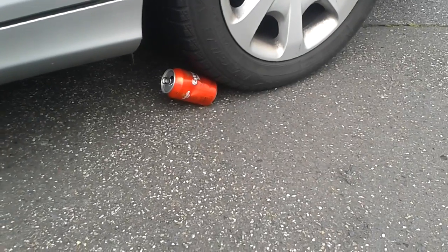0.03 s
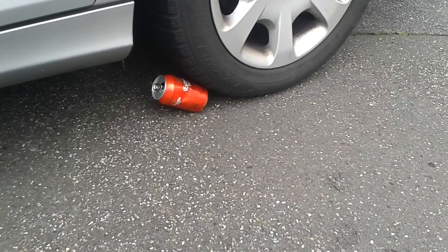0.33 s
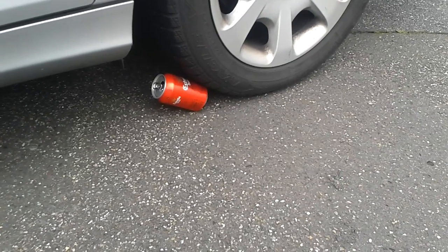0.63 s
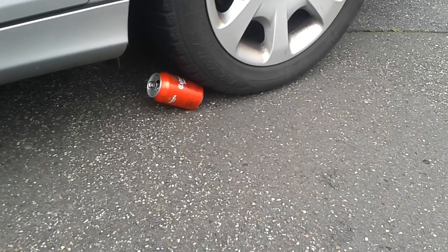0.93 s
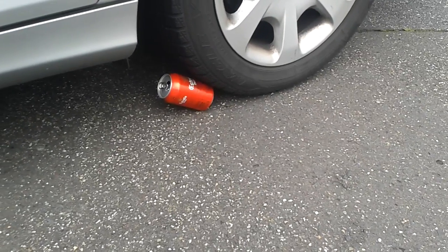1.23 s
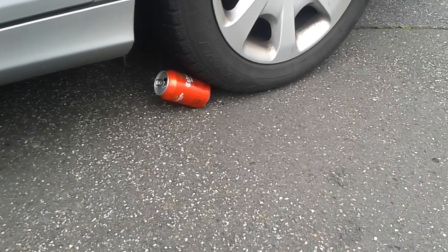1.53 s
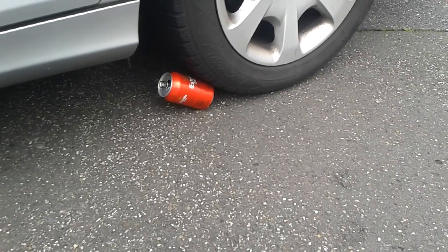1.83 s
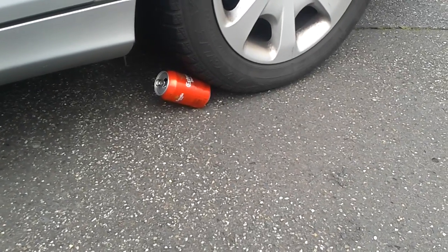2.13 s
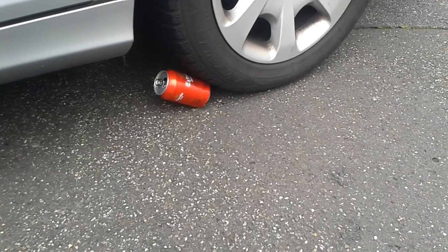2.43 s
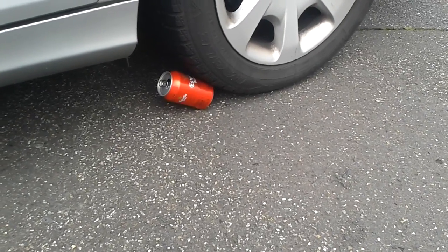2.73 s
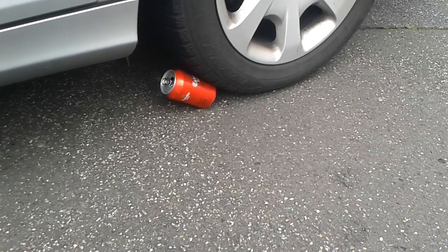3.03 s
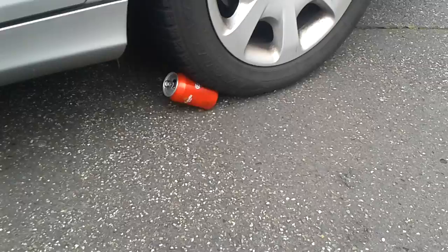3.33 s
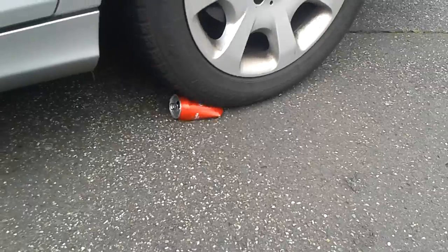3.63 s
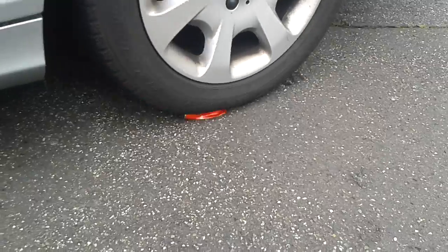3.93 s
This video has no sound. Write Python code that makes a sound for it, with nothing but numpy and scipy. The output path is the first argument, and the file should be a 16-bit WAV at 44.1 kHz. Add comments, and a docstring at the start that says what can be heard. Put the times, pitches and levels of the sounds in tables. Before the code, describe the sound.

An empty drink can is crushed under a creeping car tyre, heard about a metre away over an idling engine and faint hiss. At 0.6 seconds the can gives one bright, ringing snap. A few dull knocks come from the car around 2 seconds, and the engine slows from 2.5. From about 3 seconds the can buckles in ever faster, louder hollow pops and crinkles, peaking just before 4.

```python
"""An empty drink can is crushed on asphalt by a creeping car, about a metre away.
The can gives one bright snap, then buckles in ever faster, louder pops that ring
the air inside it and echo under the car. The idling engine slows as the tyre
takes the load. A faint hiss lies behind it all."""
import sys
import numpy as np
from scipy import signal
from scipy.fft import rfft, irfft
from scipy.io import wavfile
from scipy.ndimage import uniform_filter1d, map_coordinates

SR = 44100
rng = np.random.default_rng(int(sys.argv[2]) if len(sys.argv) > 2 else 0)


def put_to_file(sound):
    """Save the sound as 16-bit audio at rate SR, in the file named by the first command-line argument."""
    columns = np.atleast_2d(sound).T  # one column per channel
    safe = np.clip(columns, -1, 1)
    whole_steps = np.round(safe * 32767)
    wavfile.write(sys.argv[1], SR, whole_steps.astype(np.int16))


N = 4 * SR

# The snap's bright wash and its slower tail. Each row: frequency in Hz, relative level in dB.
SNAP_WASH = [(300, 2), (500, -1), (700, 0), (850, -20), (1010, 3.5), (1150, -7), (1350, -4), (1500, -10),
             (1760, -8), (2140, -10), (2480, -2), (2830, -24), (3400, -17), (4600, -13.5), (6300, -15),
             (7200, -23), (9100, -13), (10600, -26), (13300, -15), (15000, -24)]
SNAP_TAIL = [(900, -22), (1150, 4.5), (1500, -4), (2400, 1), (2900, -6), (5000, -15), (9000, -30)]
# Notes of the still round can. Each row: pitch in Hz, level in dB, fade time in seconds.
CAN_NOTES = [(1020, -37, 0.1), (1085, -37, 0.28), (1192, -36, 0.39), (1250, -43, .3), (1293, -36, 0.14),
             (1810, -35, 0.25), (2130, -30, 0.14), (2140, -41, 0.27), (2396, -35, 0.25), (2455, -32, 0.1),
             (3230, -38, 0.069), (8880, -33, 0.043)]
def snap(start_s=.6352, swell_s=.00065):
    """The first dent: one pop sets the thin wall and the whole can ringing."""
    out = np.zeros(N)
    add(out, start_s, pop(db=-7, hz=536, swell_s=swell_s))
    wash = undb(-17.5) * fade(.072) * noise(SNAP_WASH)[:SR // 2]
    tail = undb(-31) * fade(.17) * noise(SNAP_TAIL)[:SR // 2]
    add(out, start_s + swell_s, wash + tail + ring(CAN_NOTES))
    return out


# The wall giving way. Each row: start in seconds, pop level in dB, pop pitch in Hz,
# swell time in seconds, crinkle level in dB, tick level in dB.
BUCKLES = [ (3.077, -31, 790, 0.0012, -43, -57), (3.101, -18.5, 714, 0.001, -37, -68),
           (3.1682, -12, 586, 0.00071, -35, -46), (3.188, -12.5, 654, 0.0012, -44, -56),
           (3.249, -29.5, 746, 0.0015, -45, -56), (3.287, -19, 466, 0.0014, -49, -56),
           (3.303, -41, 700, 0.001, -46, -47), (3.337, -26, 714, 0.0014, -57, -53),
           (3.3485, -36, 1010, 0.0005, -33, -41.5), (3.393, -20, 523, 0.00072, -37, -58),
           (3.4723, -35, 730, 0.0014, -45, -40), (3.542, -36, 496, 0.00079, -48, -46),
           (3.551, -29, 597, 0.0012, -37, -47), (3.570, -20.5, 553, 0.0015, -52, -53),
           (3.591, -27, 895, 0.00032, -30.5, -45.5), (3.599, -31, 1010, 0.00053, -33.5, -52),
           (3.6384, -16, 770, 0.00076, -31, -32), (3.650, -19, 780, 0.0012, -32, -43),
           (3.6714, -11.5, 520, 0.00095, -32.5, -33), (3.684, -14.5, 605, 0.0011, -34, -50),
           (3.711, -13.5, 575, 0.0018, -26.5, -32), (3.693, -30, 905, 0.0014, -51, -48),
           (3.7188, -16, 620, 0.0012, -30, -40.5), (3.725, -28, 1020, 0.0013, -42, -50),
           (3.735, -37, 700, 0.0012, -45, -41), (3.7524, -10, 655, 0.0016, -22, -40.5),
           (3.7675, -6, 637, 0.00092, -52, -67), (3.78, -24, 890, 0.0013, -44, -58),
           (3.783, -21, 594, 0.0022, -34, -29.5), (3.796, -18.5, 576, 0.002, -45, -59),
           (3.804, -24, 590, 0.003, -52, -62), (3.8515, -10.5, 720, 0.0006, -23, -29),
           (3.858, -19, 586, 0.00065, -44, -45), (3.874, -20, 610, 0.0025, -32, -50),
           (3.8823, -3.5, 570, 0.0017, -18.5, -31.5), (3.8895, -11, 355, 0.0015, -31, -39),
           (3.8943, -7.5, 700, 0.0014, -23, -28.5), (3.9, -14, 710, 0.0012, -37, -46),
           (3.908, -32, 820, .0013, -38, -53), (3.9148, -7, 675, 0.0023, -22, -49),
           (3.923, -9, 644, 0.0019, -43, -33.5), (3.965, -26.5, 687, 0.0057, -44, -64),
           (3.982, -28, 666, 0.0012, -26.5, -40), (3.9935, -14, 710, 0.0016, -36, -41)]
# The tone of a crinkle and of a tick. Each row: frequency in Hz, relative level in dB.
CRINKLE = [(700, -14), (1000, 13), (1350, -6.5), (1680, -0.5), (2300, -1.5), (2800, -20), (4000, -23),
           (7000, -36)]
TICK = [(2000, -3), (3500, -5.5), (5500, 4.5), (7200, -6), (8800, 3), (10800, -14), (13300, -3),
        (15000, -15)]
def buckles():
    """Each buckle pops, crinkles, ticks and rings the stiff rim, damped by the rubber tyre."""
    pops, rim, crinkle_level, tick_level = np.zeros((4, N))
    roughness = unit(np.exp(.21 * wander(900)))
    for start, pop_db, hz, swell_s, crinkle_db, tick_db in BUCKLES:
        add(pops, start, pop(pop_db, hz, swell_s))
        rim_hz = 940 * (1 + .049 * rng.standard_normal())
        add(rim, start, pop(pop_db - 21, rim_hz, swell_s=.0028))
        add(crinkle_level, start, undb(crinkle_db) * fade(.047))
        add(tick_level, start + .00046, undb(tick_db) * fade(.023))
    crinkles = colour(crinkle_level * roughness * rng.standard_normal(N), CRINKLE)
    ticks = colour(tick_level * roughness * rng.standard_normal(N), TICK)
    return pops + rim + crinkles + ticks + ringing(pops, crinkles)


# Notes of the air in the can and under the tyre, and of the dented wall.
# Each row: pitch in Hz, relative level in dB, fade time in seconds.
AIR_NOTES = [(228, -62, 0.41), (335, -55, 0.045), (580, -85, 0.099), (680, -69.5, 0.32), (1011, -52, 0.097)]
WALL_NOTES = [(1640, -18.5, 0.13), (1780, -31, 0.081), (1886, -23, 0.17), (2090, -26, 0.14),
              (2540, -39, .1)]
def ringing(pops, crinkles):
    """Pops make the hollow ring; crinkles make the metal ring."""
    air = signal.fftconvolve(pops, ring(AIR_NOTES))
    wall = undb(-29) * signal.fftconvolve(crinkles, ring(WALL_NOTES))
    return (air + wall)[:N]


# Each row: start in seconds, level in dB, pitch in Hz, swell time in seconds.
CLACKS = [ (3.713, -30, 1870, 0.0011), (3.7185, -29, 1930, 0.0021), (3.738, -35, 1740, 0.0012),
          (3.7512, -27, 1670, .0007), (3.762, -29, 1850, 0.0014), (3.8945, -15, 1760, 0.0011),
          (3.9146, -19, 1770, .0007)]
THUMPS = [(3.8832, -15.5, 301, 0.0018), (3.901, -12, 260, 0.0021), (3.932, -23.5, 230, .016)]
def flattening():
    """Small patches of wall flip with high clacks; the tyre thumps down on the flat can."""
    return play_pops(CLACKS + THUMPS)


# How loud the fine creasing is. Each row: time in seconds, level in dB.
CREASING_LEVEL = [(2.95, -77), (3.09, -43.5), (3.22, -49), (3.45, -53), (3.58, -46), (3.68, -37.5),
                  (3.75, -42.5), (3.82, -50), (3.9, -34), (3.95, -34.5), (4.0, -50)]
# Its tone. Each row: frequency in Hz, relative level in dB.
CREASING_TONE = [(300, 10.5), (600, 8), (1050, 0), (1350, -7), (1700, 1), (2300, -9), (2900, -11),
                 (5500, -29), (7200, -26), (8800, -29), (14000, -38)]
def creasing(folds_per_s=770, spread_db=4.5):
    """Countless tiny folds click in the wall as the weight comes on."""
    folds = rng.random(N) < folds_per_s / SR
    strength = undb(spread_db * rng.standard_normal(N))
    clicks = folds * strength * np.sign(rng.standard_normal(N))
    return colour(unit(clicks) * undb(curve(CREASING_LEVEL)), CREASING_TONE)


# The echo's tone. Each row: frequency in Hz, relative level in dB.
ECHO = [(150, 10), (600, -3), (2000, -3.5), (6000, -0.5), (14000, 2.5)]
def echo_under_car(sound):
    """The sound plus its quick bounces between the road and the car."""
    echo = np.zeros(N)
    add(echo, start_s=.004, sound=noise(ECHO)[:SR // 2] * fade(.087))
    return sound + undb(-10) * signal.fftconvolve(sound, echo / np.linalg.norm(echo))[:N]


# Engine speed. Each row: time in seconds, firings per second.
SPEED = [(0, 46.75), (.45, 46.3), (1.0, 45.55), (1.25, 44.82), (1.5, 44.98), (1.65, 44.75), (1.8, 44.0),
         (2.05, 43.98), (2.25, 43.65), (2.47, 42.8), (2.6, 41.1), (2.77, 37.85), (3.0, 34.3), (3.3, 33.6),
         (3.5, 33.1), (3.7, 31.9), (4.0, 31.8)]
def engine():
    """The slightly uneven firings set the pace of the hum and the clatter."""
    firing_hz = curve(SPEED)
    firings = np.cumsum(firing_hz * (1 + .0013 * wander(12))) / SR
    return hum_and_whine(firing_hz, firings) + clatter(firings)


# Firings per second at four stages of load: running free, pulling, bogging down, labouring.
STAGES_HZ = [46.4, 43.9, 39.0, 33.8]
# The hum. Each row: multiple of the firing rate, then its level in dB at each stage.
HUM = [ (1, -31, -31.5, -38, -44), (2, -32.5, -29.3, -27, -41), (3, -35, -43, -41, -40),
       (3.48, -31.5, -42, -42, -41), (4, -33, -37, -36, -47), (5, -47, -38, -42, -38),
       (6.96, -43, -43, -33.5, -46), (18.37, -66, -48, -47, -60), (19.14, -53, -60, -55, -59),
       (20.58, -54, -52, -49, -60), (21.35, -62, -71, -52, -46.5), (23.8, -55, -57, -55, -45.5),
       (10.48, -51.5, -48, -59, -45.5), (12.15, -51.5, -58, -49, -51), (4.426, -49, -59, -42, -70),
       (5.86, -49.5, -44, -50, -70), (6.31, -48.5, -42.5, -41, -53)]
# Belt whines. Each row: multiple of the firing rate, a list of (time in seconds, level in dB).
WHINES = [ (13.92, [(.3, -54), (.9, -43), (1.7, -43), (2.45, -45), (2.7, -54)]), (15.52, [(0, -42),
          (1.5, -42), (1.8, -50), (2.3, -54), (2.8, -58)]), (16.24, [(0, -53), (1.8, -49), (2.35, -47),
          (2.56, -39), (2.7, -55)]), (22.98, [(0, -51), (.8, -56), (1.2, -50), (2.2, -47.5), (2.55, -47),
          (2.78, -43.5), (3.05, -52)]), (45.95, [(.2, -50), (.55, -58), (1.05, -59), (1.3, -52.5),
          (1.75, -52), (2.3, -57), (2.5, -68)]), (50.95, [(.4, -64), (.9, -56), (1.3, -61), (2.55, -68),
          (2.76, -53), (2.95, -60), (3.2, -74)]), (53, [(2.5, -76), (2.8, -60), (3.0, -53), (3.25, -70)])]
def hum_and_whine(firing_hz, firings):
    """Tones follow the engine speed: the hum changes with load, the belt whines come and go."""
    # The minus signs are there because np.interp needs rising values.
    hum = [(multiple, np.interp(-firing_hz, -np.array(STAGES_HZ), dbs)) for multiple, *dbs in HUM]
    whines = [(multiple, curve(levels)) for multiple, levels in WHINES]
    out = np.zeros(N)
    for multiple, db in hum + whines:
        waver_db = 1.5 * min(multiple / 10, 1) * wander(5.5)  # low tones are steadier
        out += undb(db + waver_db) * np.sin(2 * np.pi * (multiple * firings + rng.random()))
    return out


# The clatter's tone. Each row: frequency in Hz, relative level in dB.
CLATTER_TONE = [(35, -17), (55, -19), (78, 3), (105, 0), (135, -4), (200, -4), (265, -2), (360, -10),
                (470, -16), (560, -16), (720, -13.5), (800, -17), (1020, -25), (1190, -28.5), (1900, -28),
                (2400, -33), (2800, -44.5), (3400, -47), (4400, -61)]
# How loud it is. Each row: time in seconds, bass level in dB, treble level in dB.
CLATTER_LEVEL = [(0, -35.5, -39.5), (.8, -38.5, -40), (1.15, -34, -41), (1.6, -39.5, -40), (1.95, -32, -40),
                 (2.3, -39, -40.5), (2.8, -34, -40.5), (3.3, -37, -42), (4.0, -32.5, -47)]
def clatter(firings, repeat_share=.4, split_hz=387):
    """Moving parts rattle, partly repeating every four firings; the treble throbs and flickers."""
    cycle = irfft(np.exp(2j * np.pi * rng.random(513)))  # noise for one engine cycle
    position = firings / 4 % 1 * len(cycle)
    repeating = unit(map_coordinates(cycle, [position], mode="grid-wrap")) / 2
    mix = np.sqrt(repeat_share) * repeating + np.sqrt(1 - repeat_share) * rng.standard_normal(N)
    rattle = colour(mix, CLATTER_TONE)
    bass = signal.sosfiltfilt(signal.butter(2, split_hz, fs=SR, output="sos"), rattle)
    throb = 1 + .054 * np.cos(2 * np.pi * firings)
    flicker = undb(-.23 * wander(24.66))
    treble = throb * flicker * unit(rattle - bass)
    return unit(bass) * undb(curve(CLATTER_LEVEL)) + treble * undb(curve(CLATTER_LEVEL, column=2))


# Each row: start in seconds, level in dB, pitch in Hz.
KNOCKS = [(1.784, -27, 412), (1.895, -21, 334), (1.908, -23.5, 370), (1.926, -22, 347), (1.984, -26, 242),
          (1.999, -23, 444), (2.09, -23, 336), (2.105, -32, 380)]
def knocks(swell_s=.0025):
    """A few dull knocks come from the car."""
    return play_pops([(start, db, hz, swell_s) for start, db, hz in KNOCKS])


# Each row: frequency in Hz, relative level in dB.
HISS = [(1760, -45), (3000, -0.5), (3290, -5.5), (3850, -4.5), (4460, -2.5), (5180, -5.5), (7960, -2.5),
        (13800, -6), (14500, -7.5)]
def hiss():
    """A faint, even hiss in the background."""
    return undb(-60) * noise(HISS)


def pop(db, hz, swell_s):
    """A panel flips over: a few vibrations that swell and die."""
    t = np.arange(SR // 10) / SR
    return undb(db) * t / swell_s * np.exp(1 - t / swell_s) * np.sin(2 * np.pi * hz * t)


def play_pops(rows):
    """One pop for each row, at its start time."""
    out = np.zeros(N)
    for start, db, hz, swell_s in rows:
        add(out, start, pop(db, hz, swell_s))
    return out


def ring(notes):
    """Struck notes dying away together."""
    t = np.arange(SR // 2) / SR
    return sum(undb(db) * fade(fade_s) * np.sin(2 * np.pi * hz * t) for hz, db, fade_s in notes)


def fade(fade_s):
    """Half a second of fading, 60 dB down after fade_s seconds."""
    return np.exp(-np.log(1000) * np.arange(SR // 2) / SR / fade_s)


def colour(sound, tone):
    """Filter a sound to a tone table, cutting steeply past its ends; white noise keeps its power."""
    hz, db = np.array(tone).T
    size = N + SR // 2
    octave = np.log2(np.arange(size // 2 + 1) * SR / size + 1)
    beyond = np.abs(octave - np.clip(octave, np.log2(hz[0]), np.log2(hz[-1])))
    gain = unit(undb(np.interp(octave, np.log2(hz), db) - 60 * beyond))
    return irfft(rfft(sound, size) * gain, size)[:N]


def noise(tone):
    """Noise with the given tone and a power near 1."""
    return colour(rng.standard_normal(N), tone)


def wander(steps_per_s):
    """A smooth random drift, about 1 in size."""
    width = int(SR / steps_per_s)
    steps = np.repeat(rng.standard_normal(N // width + 1), width)
    return unit(uniform_filter1d(uniform_filter1d(steps, width), width)[:N])


def curve(table, column=1):
    """Join the rows of a time table with straight lines."""
    rows = np.array(table)
    return np.interp(np.arange(N) / SR, rows[:, 0], rows[:, column])


def add(out, start_s, sound):
    """Mix a sound in at its time."""
    i = min(int(start_s * SR), N - 1)
    out[i:i + len(sound)] += sound[:N - i]


def undb(db):
    """Turn decibels into a gain."""
    return 10 ** (np.asarray(db) / 20)


def unit(x):
    """Scale to an average power of 1."""
    return x / np.sqrt(np.mean(x ** 2))


def scene():
    """The can and its echo, the car and the hiss, in one channel."""
    can = snap() + buckles() + flattening() + creasing()
    return (echo_under_car(can) + engine() + knocks() + hiss())[None]


def record(dry):
    """Cut the treble above 14800 Hz."""
    return signal.sosfilt(signal.ellip(10, .2, 80, 14800, fs=SR, output="sos"), dry)


dry = scene()
out = record(dry)
put_to_file(out)
```